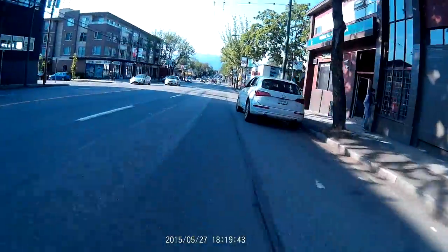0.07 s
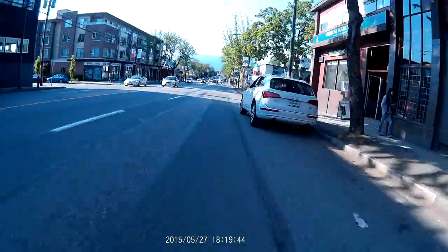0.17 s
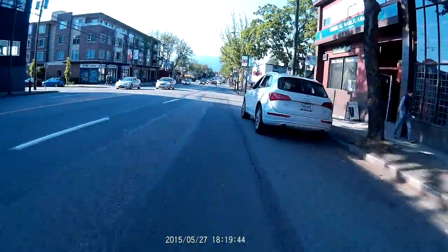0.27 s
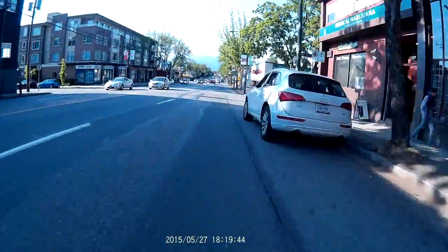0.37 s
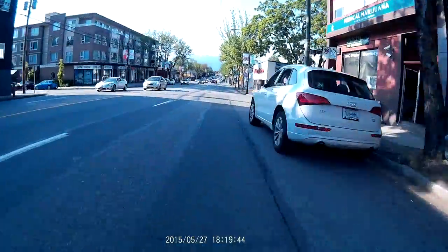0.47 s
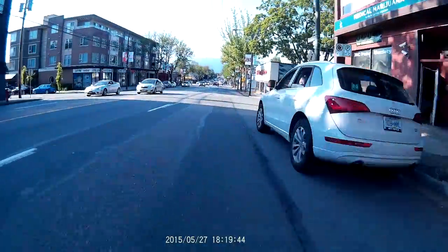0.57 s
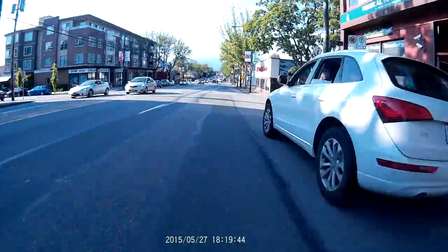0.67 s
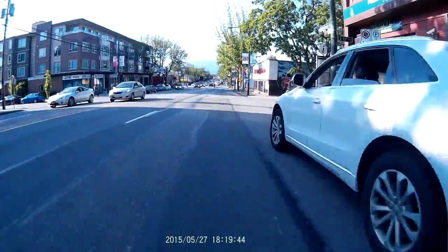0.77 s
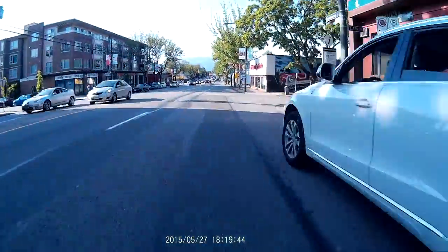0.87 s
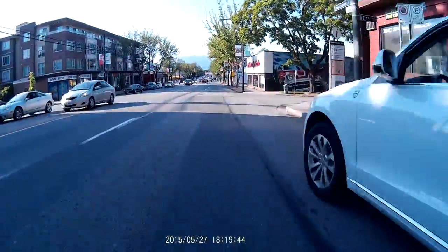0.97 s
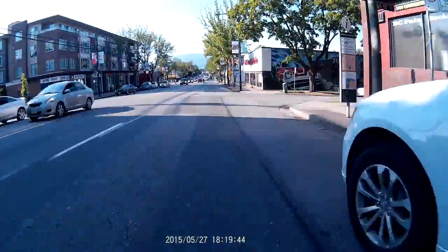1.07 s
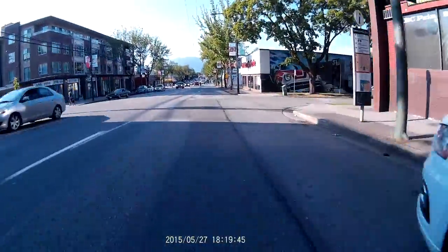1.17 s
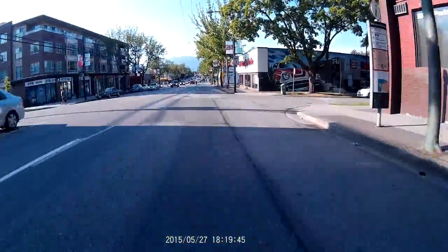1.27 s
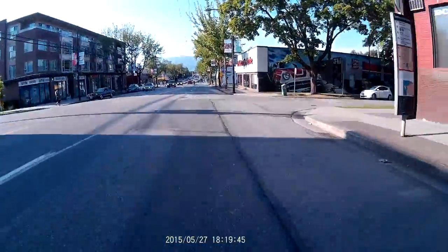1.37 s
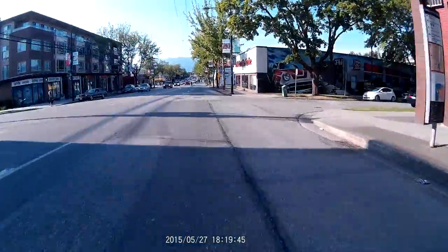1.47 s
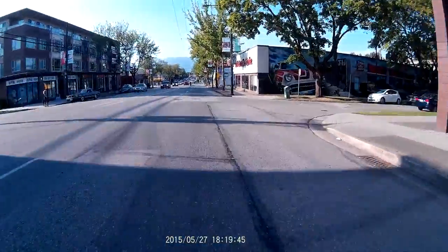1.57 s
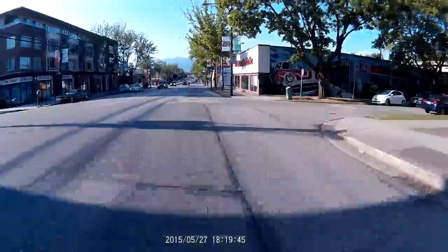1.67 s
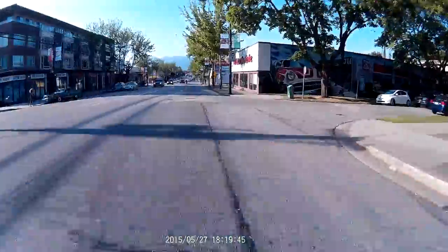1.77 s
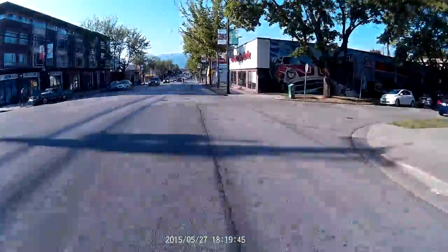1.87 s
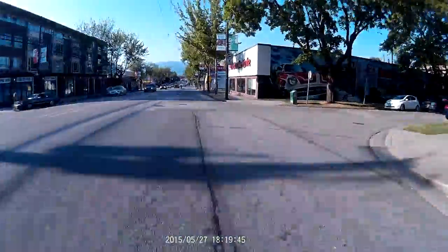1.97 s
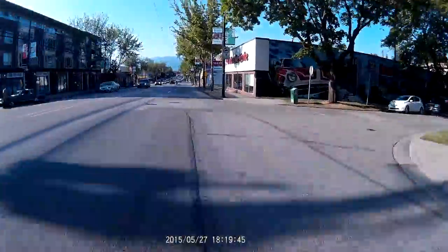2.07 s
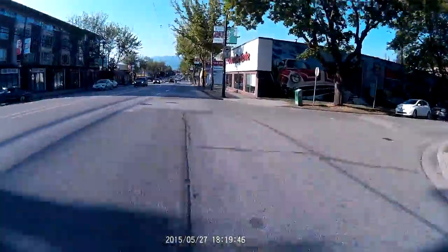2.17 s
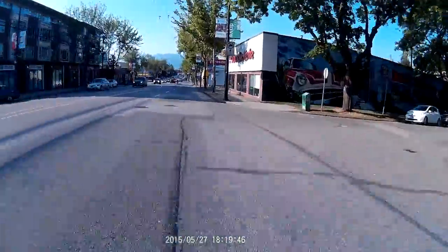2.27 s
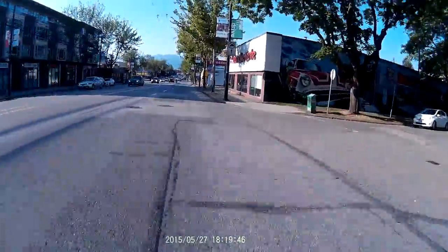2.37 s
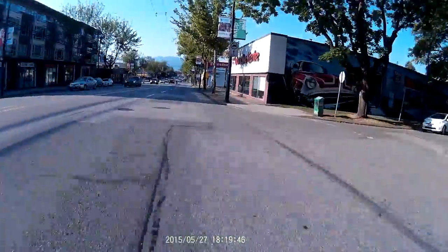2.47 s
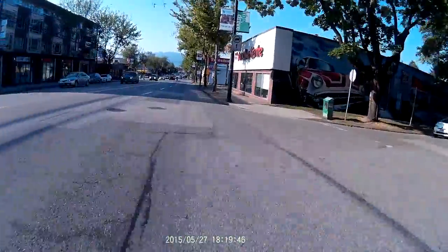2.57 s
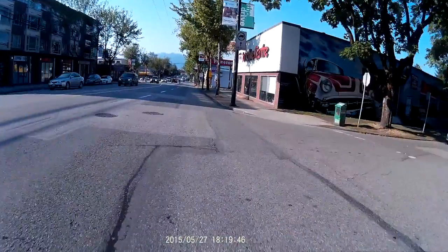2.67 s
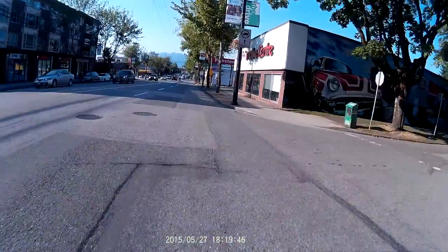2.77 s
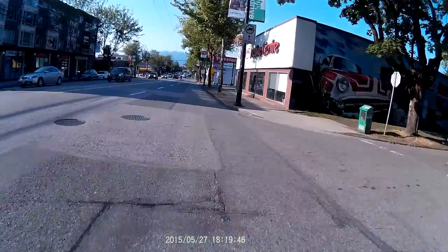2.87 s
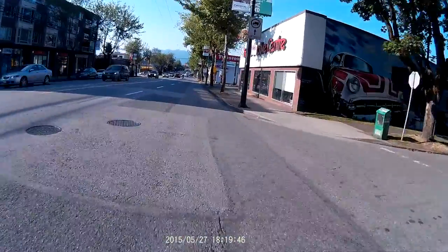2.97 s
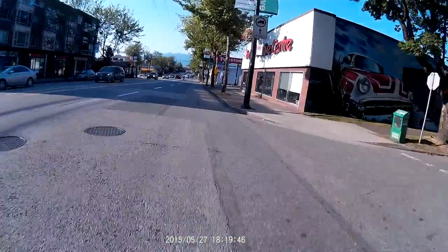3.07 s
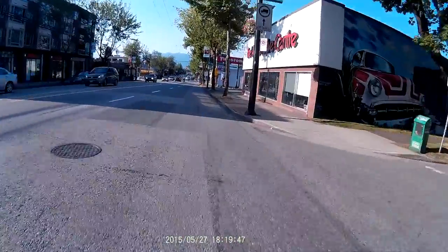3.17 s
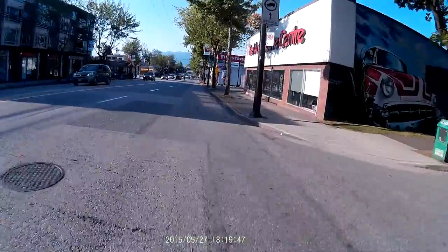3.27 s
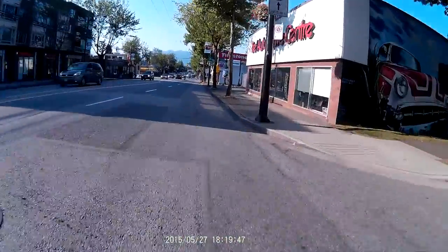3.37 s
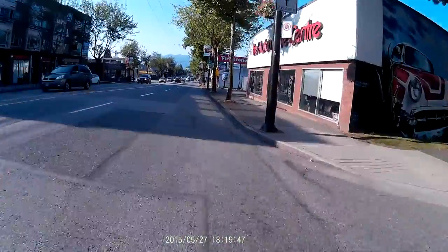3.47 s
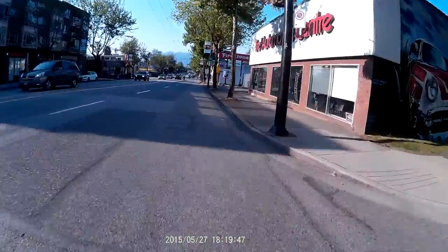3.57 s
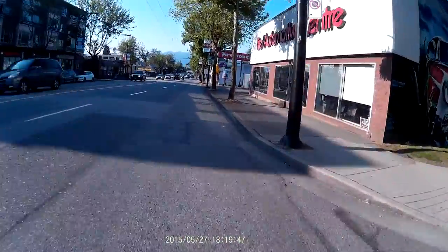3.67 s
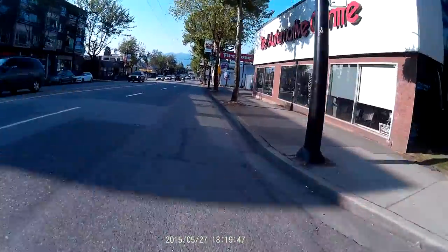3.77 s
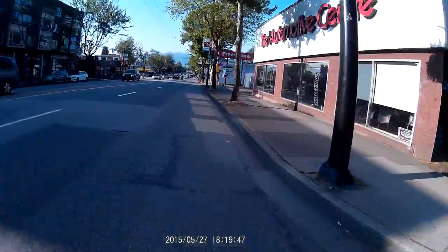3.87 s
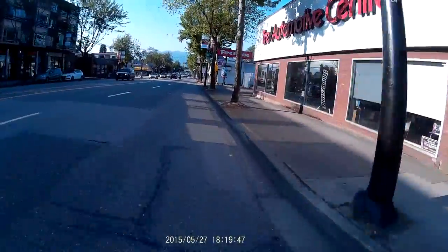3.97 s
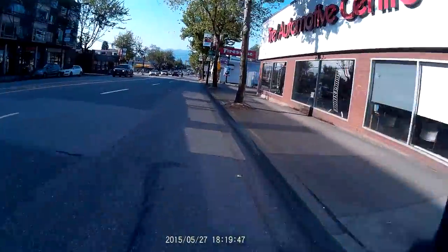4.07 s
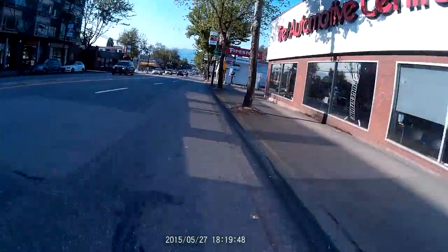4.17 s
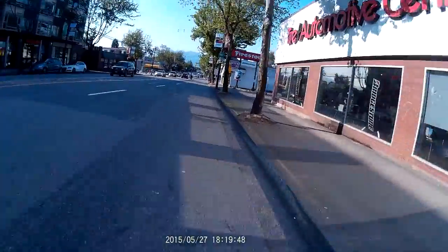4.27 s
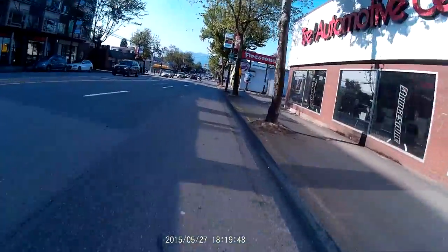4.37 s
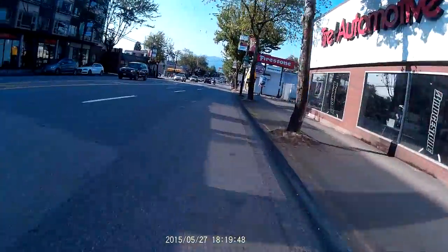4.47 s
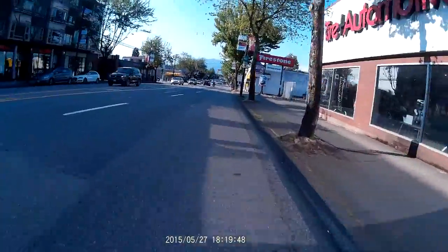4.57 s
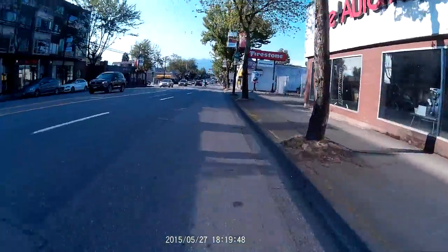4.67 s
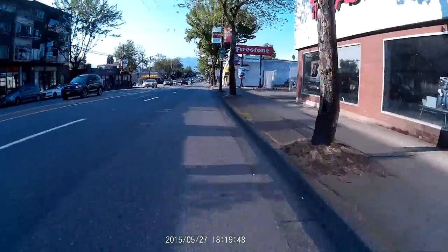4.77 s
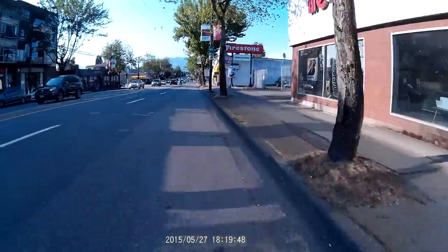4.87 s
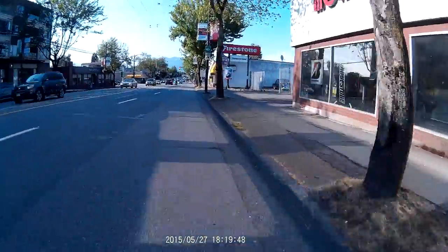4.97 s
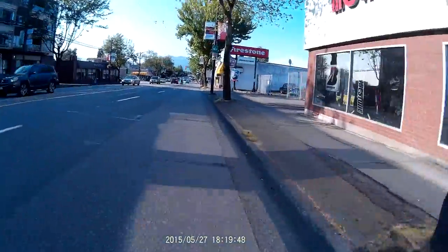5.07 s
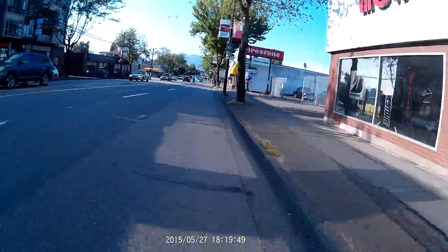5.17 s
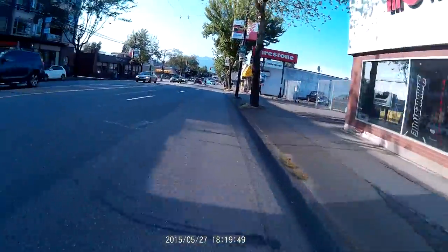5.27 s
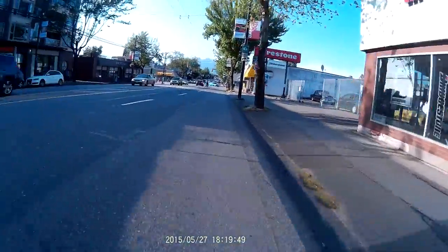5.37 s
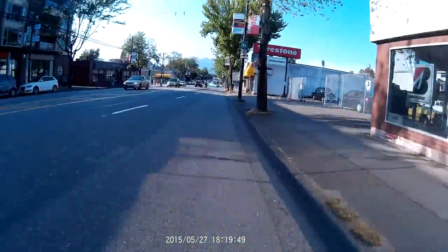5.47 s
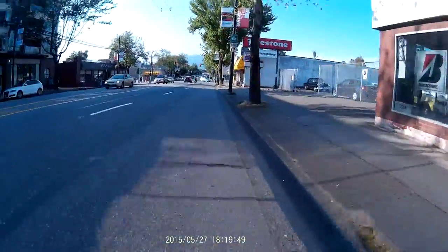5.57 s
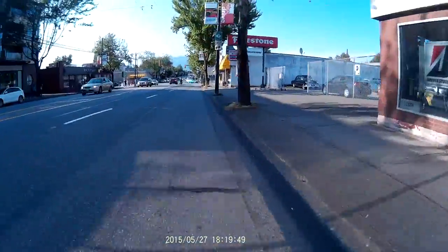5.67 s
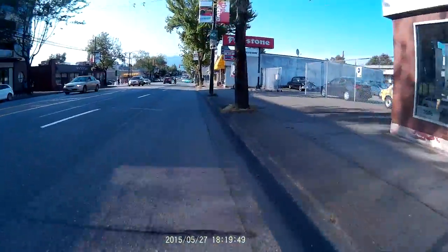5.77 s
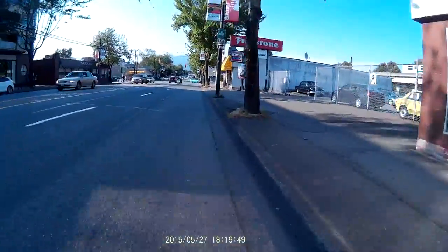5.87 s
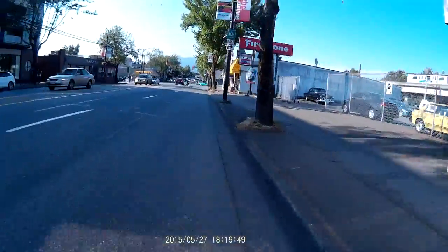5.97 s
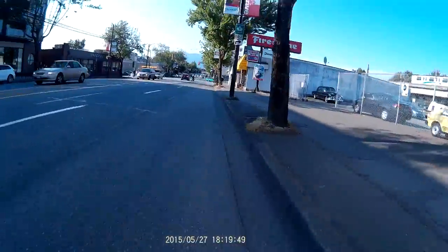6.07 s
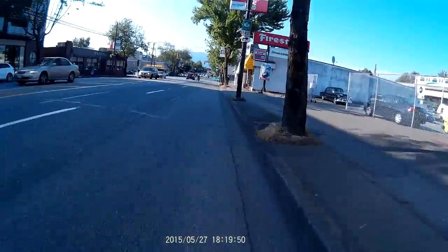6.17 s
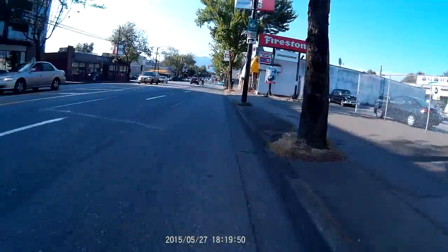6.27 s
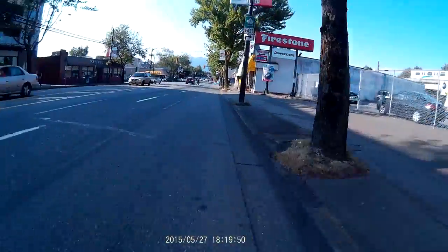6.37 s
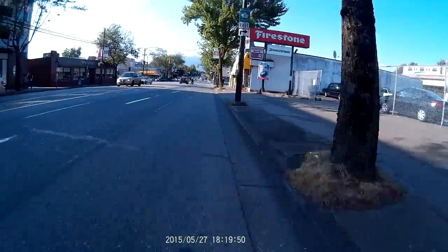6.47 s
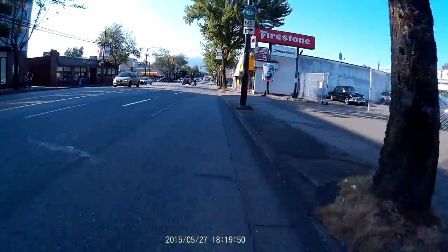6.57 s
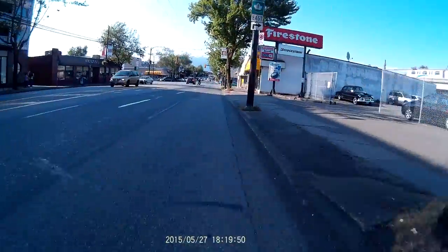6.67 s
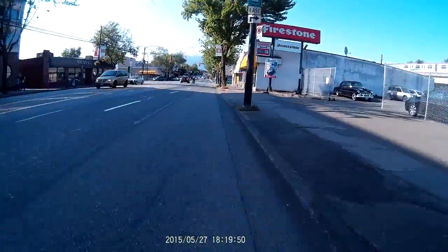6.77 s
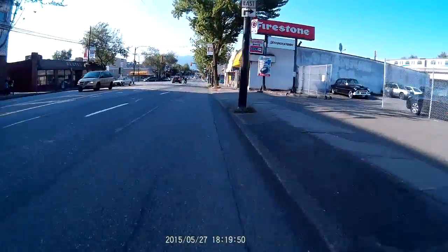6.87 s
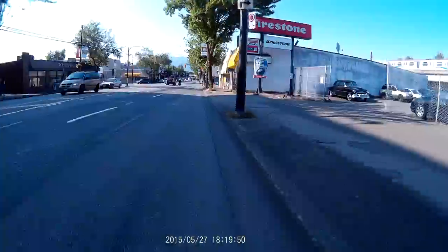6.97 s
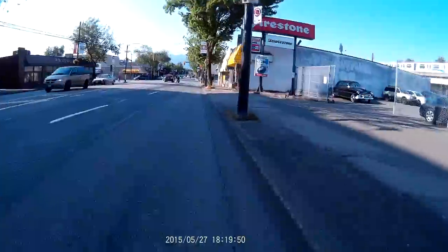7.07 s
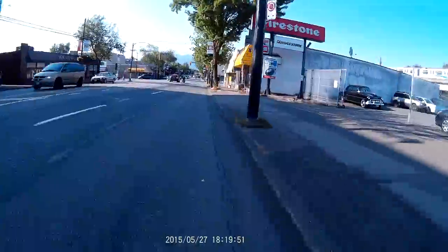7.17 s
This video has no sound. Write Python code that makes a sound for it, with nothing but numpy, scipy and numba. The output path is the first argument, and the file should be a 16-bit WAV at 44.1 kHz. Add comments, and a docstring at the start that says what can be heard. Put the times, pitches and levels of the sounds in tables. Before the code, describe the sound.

A bicycle rolls along a city street, heard through a camera clamped to it. An uneven low-mid hum and gusting wind rumble run throughout. After a few isolated clicks, the plastic case rattles in tight, buzzing bursts, hardest near three seconds, then more sparsely. Later a few cracks in the road thud through the frame with sharp clatter. Very close, boxy and slightly distorted on the loudest hits.

```python
"""Rattling camera on a rolling bicycle

An action camera is clamped to a bicycle on an asphalt street; most sound reaches its microphone through the clamp.
Filtered noise makes the mount hum near 300 Hz, and noise-driven modes ring the plastic case. On wide swings
the case knocks against its holder; grit ticks on it, and cracks in the road thud through the frame as short
sine bursts. Wind rumbles on the microphone as gusting noise bands; the recorder rides its gain and clips."""
import sys
import numpy as np
from scipy import signal
from scipy.io import wavfile
from scipy.ndimage import uniform_filter1d
from numba import njit

SR = 44100
rng = np.random.default_rng(int(sys.argv[2]) if len(sys.argv) > 2 else 0)


def digitize_waveform(pressure):
    """Quantize a signal to 16-bit integers and store it at the path in sys.argv[1].

    Rows of a 2-D input are taken as channels; values are limited to [-1, 1].
    """
    field = np.atleast_2d(pressure).T
    bounded = np.clip(field, -1, 1)
    quanta = np.round(bounded * 32767).astype(np.int16)
    wavfile.write(sys.argv[1], SR, quanta)


N = 318402  # samples

# Levels along the ride: time_s, mount_hum_db, wind_db, then the relative road shake of three groups of
# case modes: low_modes_db, ring_near_2800_hz_db, high_modes_db
RIDE_LEVELS = [(0.0, -18.5, -27.5, -37.5, -56, -62), (1.29, -21, -28, -40, -56.5, -66),
               (1.85, -19.5, -27.5, -37, -55.5, -62), (2.19, -24, -30, -46.5, -54, -66.5),
               (2.53, -24.5, -30, -38, -59, -62.5), (2.71, -16, -25, -36, -47, -55),
               (2.87, -26, -39, -46.5, -49, -56.5), (3.06, -25.5, -37, -42.5, -47, -51.5),
               (3.3, -24, -27.5, -41.5, -46, -52), (3.62, -23, -33.5, -41, -45, -47.5),
               (3.9, -22, -33.5, -39.5, -50, -46), (4.3, -20, -32.5, -39.5, -46.5, -49.5),
               (4.79, -19.5, -32.5, -38, -45, -46.5), (5.39, -21.5, -33, -37.5, -48.5, -53.5),
               (5.81, -22, -31.5, -42.5, -50.5, -60.5), (6.17, -23, -37.5, -43, -51, -65),
               (6.56, -19, -30, -39.5, -50.5, -62), (7.22, -21.5, -32.5, -44, -52, -65)]
# Bursts of case against holder: start_s, nominal_length_s, knocks_per_s (at the hardest),
# hardest_knock_db (relative), hollow_tone_db (relative)
RATTLE_BURSTS = [(0.777, .003, 380, -22, 5.5), (1.077, 0.0032, 340, -11.5, -4),
                 (1.9508, 0.01, 172, -11, -14), (1.963, .012, 270, -10, -5),
                 (1.9755, 0.0021, 500, -13.5, 3), (1.9824, 0.0032, 375, -5, -5),
                 (1.9913, 0.007, 237, -17.5, -13), (2.057, 0.01, 260, -7.5, -22),
                 (2.076, .019, 288, -8, -7), (2.096, .012, 311, -8, -16), (2.1957, 0.0037, 265, -17, -5),
                 (2.2383, 0.0054, 290, -20, 1.5), (2.2912, 0.0059, 300, -17.5, -0.5),
                 (2.684, 0.0036, 167, -15, 6.5), (2.745, .0435, 275, -5.5, -10),
                 (2.7891, .1, 273, -4.5, -6), (2.9195, .019, 275, -7.5, -8.5),
                 (3.022, 0.016, 253, -13.5, -7.5), (3.0877, .022, 263, -6.5, -13),
                 (3.115, .002, 230, -21, -18), (3.122, 0.0025, 324, -12.5, -17),
                 (3.132, .003, 240, -15, -8), (3.138, 0.0027, 315, -25, -12), (3.193, 0.016, 280, -7, -8),
                 (3.221, 0.015, 320, -9, -9.5), (3.2905, 0.0028, 240, -15, -10),
                 (3.433, .003, 230, -16.5, -5), (3.485, 0.019, 275, -7, -11.5),
                 (3.5456, 0.014, 270, -8.5, -8), (3.579, 0.0071, 300, -16.5, -11),
                 (3.616, 0.0096, 283, -15, -22), (3.6397, .007, 340, -11, -9),
                 (3.771, 0.0076, 370, -16, -23), (3.7936, 0.015, 285, -6.5, -25),
                 (3.8213, 0.0029, 304, -14, -16), (3.956, 0.0036, 210, -15, -4),
                 (4.026, 0.0057, 313, -5.5, -14), (4.1547, 0.0024, 220, -17.5, -6),
                 (4.1856, 0.0027, 290, -22, -9), (4.2236, .003, 250, -11.5, -20),
                 (4.3278, 0.0017, 296, -16.5, -12), (4.3866, 0.0023, 390, -15.5, -15),
                 (4.627, 0.0027, 305, -22.5, 0), (4.7045, 0.0028, 280, -16.5, -27),
                 (4.8801, .003, 330, -18.5, -20), (5.5016, 0.0098, 344, -11.5, -4),
                 (5.5141, 0.0031, 290, -5.5, -11), (5.5184, 0.0028, 216, -17, 14),
                 (5.5235, .002, 420, -10, -3), (5.532, 0.0033, 400, -19, -9), (5.839, 0.0085, 340, -10, -9),
                 (6.02, 0.018, 340, -7.5, -1), (6.1182, 0.0095, 276, -13, -6),
                 (6.196, 0.0078, 310, -11.5, -9), (6.9865, .003, 310, -19, -1.5)]
# Cracks in the asphalt: start_s, level_db, pitch_hz (of the lower partial), length_s
ROAD_BUMPS = [(1.965, -14, 71, 0.029), (2.686, -28, 59.6, 0.022), (5.508, -7.5, 85.9, 0.021),
              (5.677, -23, 69.4, 0.025), (6.017, -2.5, 57.7, 0.017), (6.981, -22, 60, 0.024)]
# Modes of the plastic case: pitch_hz, t60_s (undamped), knocked_db (relative), road_shaken_db (relative)
CASE_MODES = [(644, 0.048, -27.5, 2), (1053, 0.012, -4.5, 6), (1344, 0.025, -15, 6),
              (1501, 0.0082, -19.5, 8), (1651, 0.017, -4, 8.5), (2331, 0.025, -0.5, -3),
              (2558, 0.015, 5.5, -8), (2840, 0.018, -7, 2.5), (3566, 0.02, -7.5, -5),
              (3834, 0.0097, -9.5, -4), (3980, 0.051, -23, -14.5), (4340, 0.01, -26, -10),
              (5363, 0.025, -25.5, -17.5), (5230, 0.0038, -33.5, -19), (6700, 0.0037, -26, -31),
              (6950, 0.0082, -33.5, -28.5), (7380, 0.008, -31, -30.5), (7750, 0.016, -32.5, -24),
              (8600, 0.0051, -31.5, -39), (10700, .005, -31, -45), (11300, .008, -37, -43.5),
              (13600, .006, -29, -39.5)]
# Edges of the case's hollow tone: low_hz, high_hz
HOLLOW_BAND_HZ = (1200, 1900)
# Borders between the three groups of shaken case modes: border_hz
GROUP_BORDERS_HZ = [2700, 3200]
# Wind spectrum at the microphone: pitch_hz, density_db (per Hz, relative)
WIND_SPECTRUM = [(20, 0.5), (45, 5), (100, 2.5), (160, -2.5), (250, -13), (450, -28), (700, -30),
                 (1500, -24.5)]
# Loudest grit flung against the case: time_s, size_db (relative)
LOUD_GRIT = [(0.0381, -38), (0.2623, -48), (0.6764, -56), (0.787, -49), (0.8724, -50), (1.1242, -49),
             (1.214, -43), (1.8945, -43), (1.9291, -50), (2.0088, -43), (2.2094, -48), (2.259, -43),
             (2.507, -48), (2.6629, -43), (2.6994, -40), (5.669, -48), (6.0134, -33)]
# Clamp resonance, which sags while the case rattles loose: time_s, pitch_hz
MOUNT_PITCH = [(0, 302), (1.5, 313), (2.65, 307), (2.78, 281), (3.7, 295.6), (4.3, 300.6), (5.7, 304),
               (6.1, 296.3), (7.22, 290)]

HISS_DB, TOP_HZ = -67.5, 15950
HELD_DAMPING = 0.7  # share of t60 left while the holder presses on the case
# a burst peaks after a share of its length, at most PEAK_MAX_S; RISE_S and FALL_S shape its swell and fade
PEAK_SHARE, PEAK_MAX_S, RISE_S, FALL_S = 0.27, 0.0291, 0.036, 0.012
FIRST_SHARE = 0.66  # least size while rising, as a share of the hardest knock
SLACK = 0.08  # share by which the period of a vanishing swing exceeds that of the hardest


def undb(db):
    """Amplitude factor for a level in dB."""
    return 10 ** (np.asarray(db) / 20)


def level(x, db):
    """Set the RMS level of a signal in dB."""
    return x * undb(db) / np.sqrt(np.mean(x ** 2))


def noise():
    """White noise as long as the scene."""
    return rng.standard_normal(N)


def walk(rate):
    """Random levels held 1 / rate s and smoothed twice; spread near 1."""
    hold = int(SR / rate)
    steps = np.repeat(rng.standard_normal(N // hold + 1), hold)
    return 1.3 * uniform_filter1d(uniform_filter1d(steps, hold), hold)[:N]


@njit
def moving_bandpass(x, hz, width):
    """State-variable band-pass with a moving centre and unit gain there."""
    y, band, low = np.empty(len(x)), 0., 0.
    for i in range(len(x)):
        g, damping = np.tan(np.pi * hz[i] / SR), width / hz[i]
        v = (band + g * (x[i] - low)) / (1 + g * (g + damping))
        band = 2 * v - band
        low += 2 * g * v
        y[i] = damping * v
    return y


def double_bandpass(x, hz, width):
    """The same fixed band-pass applied twice."""
    centre_hz = np.full(N, 1. * hz)
    return moving_bandpass(moving_bandpass(x, centre_hz, width), centre_hz, width)


def hiss():
    """Steady white noise behind everything."""
    return level(noise(), HISS_DB)


def wind(db):
    """Buffeting on the microphone: noise bands that gust together and flicker alone."""
    out, gust = 0, walk(5.8)
    spectrum_hz, spectrum_db = np.transpose(WIND_SPECTRUM)
    for hz in 20 * 2 ** np.arange(0, 6.1, .5):  # half-octave steps
        band = double_bandpass(noise(), hz, hz / 2)
        band_db = np.interp(np.log(hz), np.log(spectrum_hz), spectrum_db)
        out = out + band * undb(band_db + 0.82 * gust + 1.5 * walk(14.0))
    return undb(db) * level(out, 1.0)


def bumps():
    """A crack in the asphalt thuds through the frame: two sine partials under a smooth hump."""
    out = np.zeros(N)
    for s, db, hz, length in ROAD_BUMPS:
        t = np.arange(0, length, 1 / SR)
        thud = np.sin(2 * np.pi * hz * t) + 0.89 * np.sin(2 * np.pi * 2.28 * hz * t)
        out[int(s * SR):][:len(t)] -= undb(db) * np.hanning(len(t)) * thud
    return out


def mount(hz, db):
    """Road texture, as uneven noise, drives the moving clamp resonance."""
    road = noise() * undb(0.76 * walk(14))
    hum = moving_bandpass(moving_bandpass(road, hz, 61.0), hz, 91.0)
    return undb(db) * level(hum, 1.0)


def swings(s, size, period):
    """Wide swings of the mount lead into each knock, with a crest 1.1 ms after the knock's nominal time."""
    out = np.zeros(N)
    for t0, a, p in zip(s, size, period):
        t = np.arange(-2 * p, p, 1 / SR)
        i = int((t0 + t[0]) * SR)
        turn = 2 * np.pi * (t - .0011) / p
        # the stop on one side makes the swing lopsided, which adds overtones
        overtones = .5 * np.cos(2 * turn) + 0.11 * np.cos(3 * turn) + 0.067 * np.cos(4 * turn)
        shape = np.cos(turn) + a * overtones
        out[i:i + len(t)] += a ** 0.31 * np.hanning(len(t)) * shape
    return undb(-12.5) * out


def grit():
    """Times in s and sizes of the grit: the clearest grains, and fainter ones at random."""
    loud_s, loud_db = np.transpose(LOUD_GRIT)
    place, draw = rng.random((250, 2)).T
    faint_s = place * (N - 9) / SR
    faint_db = -70 + 17 * draw ** 2
    return np.append(loud_s, faint_s), undb(np.append(loud_db, faint_db))


def knock_list():
    """Every knock as (s, size, hollow dB, period s): a burst swells to its hardest knocks and fades."""
    rows = []
    for s, length, rate, top_db, hollow_db in RATTLE_BURSTS:
        t = np.arange(0, length, 1 / rate)
        peak = min(PEAK_SHARE * length, PEAK_MAX_S)
        rise = np.maximum(1 - (peak - t) / RISE_S, FIRST_SHARE)
        fall = (length - t) / min(FALL_S, length - peak)
        share = np.clip(np.minimum(rise, fall), 0, 1)
        period = (1 + SLACK * (1 - share)) / rate
        knock_s = s + np.cumsum(period) - period
        rows += zip(knock_s, undb(top_db) * share, np.full(len(t), hollow_db), period)
    return np.array(rows).T


def ring(x, hz, t60):
    """One damped mode; a unit blow starts it at amplitude 1."""
    r, w = np.exp(-np.log(1000) / (t60 * SR)), 2 * np.pi * hz / SR
    return signal.lfilter([0, np.sin(w)], [1, -2 * r * np.cos(w), r * r], x)


def swell(x, hz, turns):
    """A wide double band-pass around a mode softens its onset so that it swells instead of clicking."""
    return double_bandpass(x, hz, hz * turns)


def chatter(blows, high):
    """The parts chatter for a moment after contact: decaying noise that feeds mostly the treble."""
    fade = np.exp(-1 / (0.0016 * SR))
    envelope = signal.lfilter([1], [1, -fade], blows)
    return envelope * noise() * (.006 + 0.7 * high ** 2)


def case(s, size, hollow_db, shake_db):
    """The case modes ring as damped resonators, struck by knocks and grit and shaken by the road."""
    jitter_s = .00004 * rng.standard_normal(len(s))
    knock_at = ((s + jitter_s) * SR).astype(int)
    grit_s, grit_size = grit()
    grit_at = (grit_s * SR).astype(int)
    grain = walk(60)  # the asphalt's grain shakes all modes together
    struck, shaken = 0, np.zeros((3, N))
    for hz, t60, knock_db, road_db in CASE_MODES:
        blows = np.zeros(N)
        high = min(hz / 8000, 1)
        # each knock lands on a slightly different spot
        db = knock_db + 1.5 * rng.standard_normal(len(knock_at))
        db += (hollow_db + 8.5) * (HOLLOW_BAND_HZ[0] < hz < HOLLOW_BAND_HZ[1])
        # harder blows touch more briefly and so wake the high modes more
        np.add.at(blows, knock_at, size ** (1 + .75 * high) * undb(db))
        # grit is small and hard: its blows differ less from mode to mode
        grit_db = -8.0 + 0.32 * knock_db + 4.0 * rng.standard_normal(len(grit_s))
        np.add.at(blows, grit_at, grit_size * undb(grit_db))
        held_ring = ring(blows + chatter(blows, high), hz, HELD_DAMPING * t60)
        struck = struck + swell(held_ring, hz, turns=0.75)
        road = noise() * undb(2.5 * walk(12) + 2.17 * grain)
        road_ring = swell(ring(road, hz, t60), hz, turns=.3)
        shaken[np.searchsorted(GROUP_BORDERS_HZ, hz)] += level(road_ring, road_db)
    shake = sum(undb(db) * level(x, 1.73) for x, db in zip(shaken, shake_db))
    return undb(-2.0) * struck + shake


def scene():
    """Frame, case, wind and hiss summed at the microphone."""
    clock = np.arange(N) / SR
    t, *columns = np.transpose(RIDE_LEVELS)
    mount_db, wind_db, *shake_db = (np.interp(clock, t, c) for c in columns)
    mount_hz = np.interp(clock, *np.transpose(MOUNT_PITCH))
    s, size, hollow_db, period = knock_list()
    frame = mount(mount_hz, mount_db) + swings(s, size, period) + bumps()
    body = case(s, size, hollow_db, shake_db)
    return (frame + body + wind(wind_db) + hiss())[None]


@njit
def ride_gain(x, top, attack, release, strength):
    """Gain falls fast when the followed level passes top and recovers slowly."""
    y, followed = np.empty(len(x)), 0.
    for i in range(len(x)):
        followed += (abs(x[i]) - followed) * (attack if abs(x[i]) > followed else release)
        y[i] = x[i] * min(1., top / (followed + 1e-9)) ** strength
    return y


def record(dry):
    """Gain control ducks loud sound, peaks clip at uneven limits, and a steep low-pass cuts the top."""
    attack_s, release_s = 0.0049, .06
    x = ride_gain(dry[0], 0.35, 1 / (attack_s * SR), 1 / (release_s * SR), 0.26)
    x = np.clip(x, -.62, .68)
    low_pass = signal.ellip(10, .2, 70, TOP_HZ, fs=SR, output="sos")
    return signal.sosfilt(low_pass, x)[None]


dry = scene()
out = record(dry)
digitize_waveform(out)
```